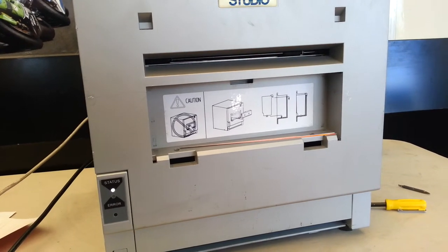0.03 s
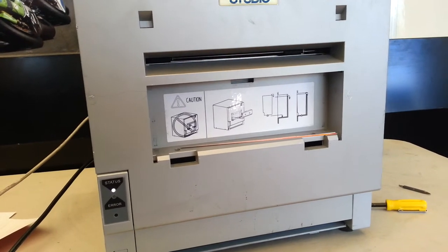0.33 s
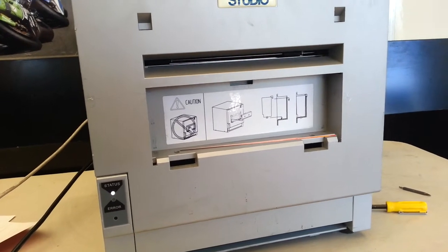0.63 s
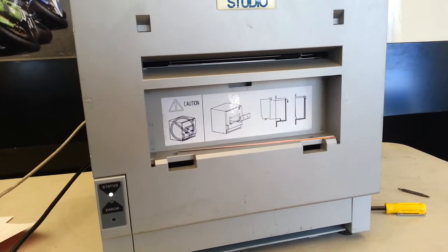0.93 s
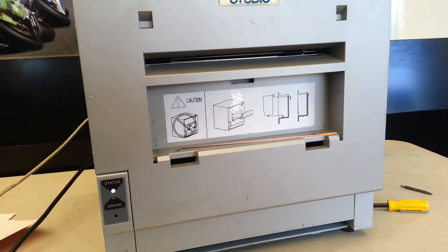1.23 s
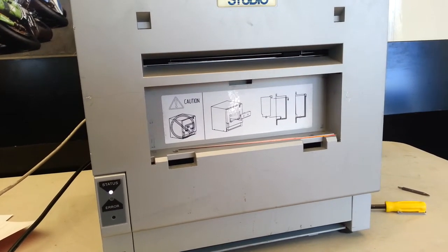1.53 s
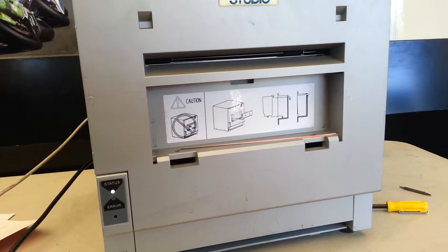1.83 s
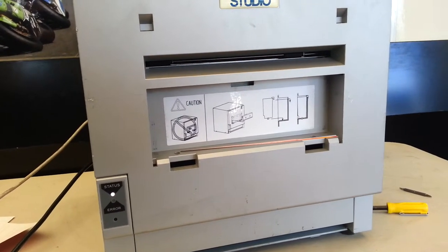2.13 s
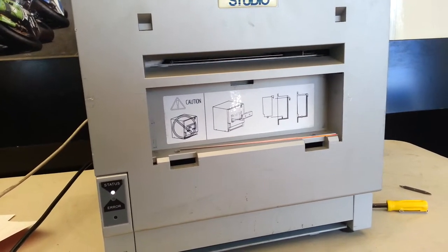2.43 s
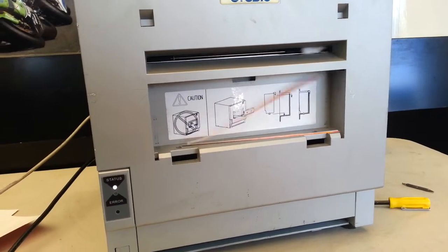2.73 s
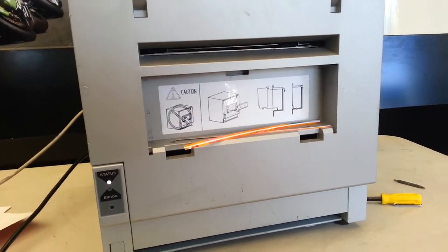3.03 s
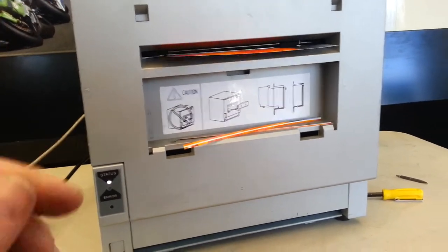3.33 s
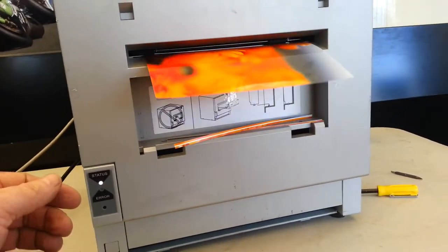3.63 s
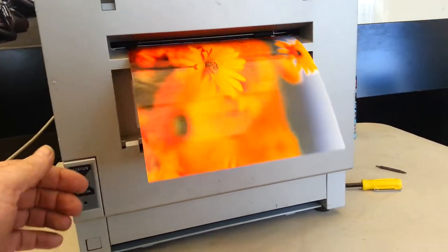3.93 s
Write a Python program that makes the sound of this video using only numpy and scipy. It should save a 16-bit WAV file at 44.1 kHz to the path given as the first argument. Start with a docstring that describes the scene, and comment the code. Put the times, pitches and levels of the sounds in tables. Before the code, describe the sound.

Printer motors whir and whine, with clunks, two buzzing cutter strokes and sliding paper.

```python
"""A photo printer on a desk finishes a print. First, stepper motors (which turn in tiny, quick steps)
whine over whirring gears. Around 1.5 s they stop and the mechanism clunks over. The paper feed motor
runs, and from 2.5 s two fast, buzzy cutter strokes each end in a clack. From 3 s the feed motor runs
again and the sheet slides out with a rising hiss."""
import sys
import numpy as np
from scipy import signal
from scipy.fft import rfft, irfft, next_fast_len
from scipy.io import wavfile
from scipy.ndimage import map_coordinates

SR = 44100
rng = np.random.default_rng(int(sys.argv[2]) if len(sys.argv) > 2 else 0)


def store_wav(level_fs):
    """Save 16-bit WAV to argv[1]."""
    pcm = np.round(np.clip(np.atleast_2d(level_fs), -1, 1) * 32767)
    wavfile.write(sys.argv[1], SR, pcm.T.astype(np.int16))


N = 176400
T = np.arange(N) / SR
JITTER_RAD, FLUTTER_DB = 0.068, 1.5  # how much a motor tone wavers in timing and loudness
GEAR_CHANGE_S = 1.82  # the print gears stop and the feed gears start


# Tones of the roller and ribbon motors: f/Hz, level/dB, left minus right/dB, left lead/rad
ROLLER_TONES = [(1295.6, -30.8, 13, -.4), (3886.8, -47, 4.5, 2.1), (5182.4, -62, 2.5, .6),
                (4764, -65, 4, 0)]
RIBBON_TONES = [(1420.56, -33, 16, -1.7), (1453, -45, 12, -1), (231.5, -48, 0, 0), (1190, -53, -2, 0),
                (710.6, -53, -2, 0)]
# Whir of the print gears: f/Hz, level/dB
PRINT_WHIR = [(40, -49), (125, -26.5), (170, -11), (290, -0.5), (370, -7), (600, -14.5), (1000, -9.5),
              (1500, -7.5), (1950, -17.5), (4500, -24.5), (6000, -33), (7700, -27.5), (9500, -37.5),
              (14000, -41)]
def print_motors():
    """The roller and ribbon motors hold their pitches over gear noise; a thin whine pulses."""
    roller = amp(1.5) * tones(ROLLER_TONES, T) * gate(-1, 1.394)
    ribbon = amp(0.5) * tones(RIBBON_TONES, T) * gate(-1, 1.645)
    pulse = 1 - 0.52 * np.cos(2 * np.pi * 5.92 * (T - 0.133))  # about six a second
    whine = pulse * tones([(2381, -43.3, -6, .2)], T, flutter_db=0.4)
    gears = amp(-38) * noise(PRINT_WHIR)
    return roller + ribbon + (whine + gears) * gate(-1, GEAR_CHANGE_S)


# Runs of the feed motor: start t/s, braking t/s
FEED_TIMES = [(1.809, 2.383), (3.034, 4.1)]
# Tones of its steps: multiple of the step rate, level/dB, left minus right/dB, left lead/rad
STEPPER_TONES = [(1, -30.5, 7, -.3), (2, -55, -8, -.3), (3, -47.5, 7, -2.1), (4, -64, -4, 0),
                 (5, -60, -4, -.4), (7, -72, -5, 0)]
# Extra tones at full speed: f/Hz, level/dB, left minus right/dB, left lead/rad
CRUISE_TONES = [(1346.25, -31, 10, -.9), (1453, -46, 12, -1), (2628.4, -62, -8, -.3), (387.6, -49, 1, 0)]
# Whir of the feed gears: f/Hz, level/dB
FEED_WHIR = [(85, -50), (135, -5.5), (190, -2.5), (310, 1.5), (560, -4.5), (820, 3.5), (1150, -8.5),
             (1500, 2.5), (2000, -13.5), (4000, -14), (6000, -29), (14000, -31)]
def feed_motor():
    """The motor speeds up roughly, settles, runs with a nearby tone beating against it, and brakes."""
    full_speed_hz, ramp_s = 1282.13, .088
    overshoot_db, settle_s = 4, .04  # the rotor overshoots on reaching full speed
    drive = cruise = 0
    for start, brake in FEED_TIMES:
        drive += np.clip(np.minimum(T - start, brake + ramp_s - T) / ramp_s, 0, 1)
        overshoot = amp(overshoot_db * np.exp(-abs(T - start - ramp_s) / settle_s))
        cruise += gate(start + ramp_s, brake) * overshoot
    step_hz = full_speed_hz * drive ** .45
    cycles = np.cumsum(step_hz) / SR
    steady = amp(1.5) * (tones(STEPPER_TONES, cycles) + tones(CRUISE_TONES, T))
    # While the speed changes, one overtone sweeps through the note at which the frame rings.
    frame = tones([(3, -26, -8, 0)], cycles, jitter_rad=1.8, flutter_db=3)
    frame *= resonance(3 * step_hz, centre_hz=2430, width_hz=340) * wobble(650)
    growl = drive * tones([(0.97, -32.5, 6, 0.0044)], cycles, jitter_rad=1.8, flutter_db=9.7)
    changing_speed = (drive > 0) & (drive < 1)
    gears = amp(-38.5) * noise(FEED_WHIR) * gate(GEAR_CHANGE_S, 5)
    return cruise * steady + changing_speed * (frame + growl) + gears


# The cutter's path out and back: t/s, f/Hz, level/dB
OUT_PATH = [(2.47, 1386, -14), (2.495, 1526, 0.5), (2.515, 1578, -6.5), (2.545, 1508, 8), (2.578, 1443, -1),
            (2.603, 1439, 6.5), (2.635, 1449, -0.5), (2.705, 1441, 1.5), (2.74, 1460, -4), (2.77, 1494, -6)]
BACK_PATH = [(2.785, 588, -5), (2.822, 569, 3.5), (2.868, 560.7, 3), (2.932, 558.4, 3.5), (2.965, 557, 4),
             (2.99, 563, 0), (3.015, 553, 1.5), (3.038, 564, 3)]
# Buzz of its gear teeth: multiple of the pitch, level/dB, left minus right/dB, left lead/rad
OUT_BUZZ = [(1, -20.5, 8, -2), (2, -25, 0.5, -1.77), (3, -30.5, 4.5, 4.5), (4, -43, -4, 1.5)]
BACK_BUZZ = [(1, -41.5, 0, 0.1), (2, -40, 2, -1.3), (3, -39, 1, -1.5), (6, -35.5, 6, 4.5),
             (9, -35.5, 0.5, 0.9), (12, -49, 0, 1.1)]
# Its rasping noise: f/Hz, level/dB
OUT_NOISE = [(90, -53), (170, -15), (330, 0), (600, -6), (900, 7), (1500, 4.5), (2100, -3.5), (3000, 4),
             (4600, 0), (6000, -10), (9000, -14), (11500, -7.5), (14000, -16)]
BACK_NOISE = [(95, -44), (160, -8), (330, -9.5), (600, -10), (900, -22), (1500, -4), (2100, -17.5),
              (3500, -8.5), (6000, -21), (9000, -23), (14000, -33)]
def cutter():
    """The blade runs out with a high buzz and comes back with a lower one."""
    outward = cutter_stroke(OUT_PATH, OUT_BUZZ, OUT_NOISE, jitter_rad=.65, rasp_db=-24)
    back = cutter_stroke(BACK_PATH, BACK_BUZZ, BACK_NOISE, jitter_rad=.36, rasp_db=-32.5)
    return outward + back


def cutter_stroke(path, buzz_tones, rasp_spectrum, jitter_rad, rasp_db):
    """Gear teeth buzz, roughest as the blade bites, and sag in pitch under load over a grainy rasp."""
    times, hz, _ = np.transpose(path)
    cycles = np.cumsum(np.interp(T, times, hz)) / SR
    bite = 1 + 4.5 * np.exp(-abs(T - times[0]) / .03)
    buzz = tones(buzz_tones, cycles, jitter_rad * bite, flutter_db=2.2)
    housing_ring = lambda f: 1 + amp(9) * resonance(f, centre_hz=4770, width_hz=124)
    buzz = filtered(buzz, housing_ring)
    grain = unit(amp(2.1 * wobble(700) + .6 * wobble(60)))
    chatter = unit(amp(2.3 * wobble(140)))
    rasp = amp(rasp_db) * grain * noise(rasp_spectrum) * gate(times[0] + 0.016, times[-1], fade_s=0.024)
    return swell(path) * buzz * chatter + rasp


# Knocks: t/s, thud level/dB, panel level/dB, crack level/dB, shudder length/s, boosted panel f/Hz
KNOCKS = [(0.028, -32, -40.5, -45, .004, 745), (1.4992, -24, -14, -22, 0.0059, 415),
          (1.639, -11, -19, -33, 0.0058, 745), (1.654, -10.5, -16.5, -27, 0.0091, 745),
          (1.691, -22, -41, -46, .006, 925), (1.732, -24, -39, -48, .004, 925),
          (1.814, -14, -19, -31, 0.012, 925), (1.826, -11.5, -19, -27.5, 0.013, 925),
          (1.867, -14.5, -10, -23.5, 0.0056, 925), (2.467, -32.5, -28, -38, .03, 415),
          (2.769, -33, -13.5, -6.5, .002, 1170), (3.039, -18, -15, -9.5, 0.034, 925),
          (3.066, -26.5, -21.5, -25, 0.049, 925)]
# Low notes of the case: f/Hz, level/dB, time to fade by 60 dB/s
CASE_NOTES = [(310, 2.5, 0.07), (264, -10.5, 0.23), (395, -14, 0.16), (174.5, -18.5, 0.17)]
# Noise of a rattling panel and of a sharp crack: f/Hz, level/dB
PANEL_NOISE = [(110, -47), (200, -4.5), (500, -14.5), (900, 0.5), (1430, 1.5), (1900, -3), (3000, -9.5),
               (8000, -47)]
CRACK_NOISE = [(300, -38), (1800, -12), (3200, 0), (4900, 0), (6000, -9.5), (9000, -15.5), (12000, -18),
               (15000, -31)]
def clunks():
    """Each knock makes the case shudder briefly; panels ring, rattle and crack into the room."""
    thuds, rattles = np.zeros(N), np.zeros((2, N))
    panel_noise, crack_noise = noise(PANEL_NOISE), noise(CRACK_NOISE)
    thud_rise_s, rattle_rise_s, low_cut_hz = .0022, .0007, 148
    t = T[:SR // 3]
    for start, thud_db, panel_db, crack_db, shudder_s, boosted_hz in KNOCKS:
        span = slice(round(start * SR), round(start * SR) + len(t))
        after_shudder = np.maximum(t - shudder_s, 0)
        case = 0
        for hz, db, fade_s in CASE_NOTES:
            detune = 1 + rng.normal(0, .01)
            case += decay(after_shudder, db, fade_s) * np.sin(2 * np.pi * hz * detune * t)
        thuds[span] += amp(thud_db) * case * (1 - np.exp(-t / thud_rise_s))
        panel = panel_ring(boosted_hz, t) + amp(-5) * panel_noise[:, span]
        panel *= decay(t, panel_db, fade_s=.085)
        crack = decay(t, crack_db, fade_s=.058) * crack_noise[:, span]
        rattles[:, span] += (panel + crack) * (1 - np.exp(-t / rattle_rise_s))
    low_cut = signal.butter(2, low_cut_hz, "high", fs=SR, output="sos")
    return signal.sosfilt(low_cut, thuds) + room_echo(rattles)


# Notes at which a panel rings: f/Hz, level/dB
PANEL_NOTES = [(415, -14), (745, -6), (925, -11), (1170, -11), (1425, -3), (1660, -11)]
def panel_ring(boosted_hz, t):
    """A panel rings at several notes at once; the spot where it is hit brings one of them out."""
    ring = 0
    for hz, db in PANEL_NOTES:
        boost_db = 11 * np.exp(-((hz - boosted_hz) / 80) ** 2)
        pan = unit(amp(look_up(BALANCE, hz) * np.array([[.5], [-.5]])))
        ring += amp(db + boost_db + rng.normal()) * pan * np.sin(2 * np.pi * (hz * t + rng.random()))
    return ring


# Loudness of the sheet's early rustle, its hiss on the way out and its rubbing: t/s, level/dB
RUSTLE_SWELL = [(.34, -61), (.44, -50), (.52, -61)]
HISS_SWELL = [(3.08, -34.5), (3.2, -40.5), (3.6, -38), (4, -37)]
RUB_SWELL = [(3.28, -43), (3.4, -39), (3.48, -31.5), (3.56, -38), (3.74, -43.5)]
# Noise of hissing and of rubbing paper: f/Hz, level/dB
HISS_NOISE = [(200, -29), (1500, -1), (2350, -13), (3050, -2), (3600, -9), (4500, -2.5), (5600, -12.5),
              (7500, -9.5), (9400, -15.5), (10600, -6.5), (12000, -12.5), (13200, -10), (14500, -30)]
RUB_NOISE = [(300, -35), (900, 6), (2100, 9), (3000, 9), (4200, -9), (9000, -66)]
def paper():
    """The sheet hisses and rubs through the slot, which rings unevenly."""
    hiss = (swell(RUSTLE_SWELL) + swell(HISS_SWELL)) * noise(HISS_NOISE)
    rub = swell(RUB_SWELL) * noise(RUB_NOISE)
    slot = gate(HISS_SWELL[0][0], 5) * tones([(3060, -47, 5, 0)], T, jitter_rad=2.4, flutter_db=1.7)
    return slot + (hiss + rub) * unit(amp(0.6 * wobble(300)))


# Loudness of the scrape as the mechanism shifts and as the feed brakes: t/s, level/dB
SHIFT_SWELL = [(1.39, -67), (1.44, -36.5), (1.575, -28.5), (1.63, -31.5), (1.72, -33.5), (1.81, -37)]
BRAKE_SWELL = [(2.385, -42), (2.42, -31.5), (2.45, -38.5), (2.475, -23.5), (2.51, -22), (2.56, -23.5)]
# Noise of the scrape: f/Hz, level/dB
SCRAPE_NOISE = [(60, -66), (170, -5), (320, -2.5), (600, -11), (1400, -3), (2000, -14), (4500, -17.5),
                (7000, -26.5), (14000, -34)]
def cam_scrape():
    """The cam (an off-centre wheel) and the gears scrape between motor runs."""
    loudness = swell(SHIFT_SWELL) + swell(BRAKE_SWELL)
    return loudness * noise(SCRAPE_NOISE) * unit(amp(3.6 * wobble(160)))


# Latch clicks: t/s, level/dB
LATCH_CLICKS = [(1.565, -37), (1.649, -29), (1.82, -32), (3.095, -24.5)]
def latches():
    """Small latches click, each a short burst of bright noise."""
    bursts = sum((T > start) * decay(abs(T - start), db, fade_s=.032) for start, db in LATCH_CLICKS)
    return bursts * noise([(5500, -20), (11000, 0)])


# Tones of the hum: f/Hz, level/dB
HUM_TONES = [(311.8, -47.5), (509, -52)]
def hum():
    """Two faint, wavering tones sound the whole time."""
    return tones([(hz, db, 0, 0) for hz, db in HUM_TONES], T, jitter_rad=0.39, flutter_db=3.5)


def room_echo(x):
    """Adds a short office echo, which starts 5 ms after the sound."""
    t = T[:SR // 2]
    tail = noise([(1000, 0)])[:, :len(t)] * decay(t, 0, fade_s=.22) * (t > .005)
    tail /= np.linalg.norm(tail[0])
    return x + amp(-4.5) * signal.fftconvolve(x, tail, axes=1)[:, :N]


# How alike the two ears hear the printer: f/Hz, likeness (1 = the same)
LIKENESS = [(40, 0), (150, 0.93), (350, 0.96), (600, 0.57), (1000, 0.73), (2000, 0), (14000, 0)]
# Which ear hears it louder: f/Hz, left minus right/dB
BALANCE = [(300, -0.5), (700, 1.5), (1100, 3.5), (1500, 9.5), (2050, -7.5), (3000, 4), (4500, 0.5),
           (6000, 0.5), (14000, -2)]
def noise(spectrum):
    """Stereo noise of strength 1 from the printer's place, shaped by rows of f/Hz, level/dB."""
    def spread(hz):
        angle = np.arccos(np.clip(look_up(LIKENESS, hz), -1, 1)) / 2
        return amp(look_up(spectrum, hz)) * [np.cos(angle), np.sin(angle)]
    mid, side = filtered(rng.standard_normal((2, N)), spread)
    pan = lambda hz: np.sqrt(1 / (1 + amp(look_up(BALANCE, hz) * [[-1], [1]]) ** 2))
    return unit(filtered(np.array([mid + side, mid - side]), pan))


def tones(rows, cycles, jitter_rad=JITTER_RAD, flutter_db=FLUTTER_DB):
    """Wavering stereo tones at multiples of a cycle count; with T as the count, multiples are in Hz."""
    mix, sides = np.zeros((2, N)), np.array([[.5], [-.5]])
    for multiple, db, pan_db, lead in rows:
        pan = amp(pan_db * sides)
        phase = 2 * np.pi * multiple * cycles + jitter_rad * wobble(170) + lead * sides
        loudness = amp(db + flutter_db * wobble(29.695))
        mix += np.sqrt(2) * loudness * pan / pan.mean() * np.sin(phase)
    return mix


def amp(db):
    """Turns decibels into a gain."""
    return 10 ** (np.asarray(db) / 20)


def unit(x):
    """Scales x to an average strength (rms) of 1."""
    return x / np.sqrt(np.mean(x ** 2) + 1e-20)


def decay(t, db, fade_s):
    """A gain that starts at db and drops 60 dB every fade_s."""
    return amp(db - 60 * t / fade_s)


def resonance(hz, centre_hz, width_hz):
    """How strongly a part rings along: 1 at its own note, less to either side."""
    return 1 / (1 + ((hz - centre_hz) / width_hz) ** 2)


def look_up(points, hz):
    """Reads between rows of f/Hz, value, on a scale of octaves."""
    f, values = np.transpose(points)
    return np.interp(np.log(hz + 1), np.log(f + 1), values)


def wobble(rate):
    """A smooth curve through `rate` random points a second."""
    return map_coordinates(rng.standard_normal(4096), [T * rate], mode="wrap")


def gate(on, off, fade_s=0.0029):
    """1 between two times, with short fades."""
    return np.clip((T - on) / fade_s + .5, 0, 1) * np.clip((off - T) / fade_s + .5, 0, 1)


def swell(rows):
    """A gain that follows rows of t/s, ..., level/dB and is silent outside them."""
    times, *_, db = np.transpose(rows)
    return amp(np.interp(T, times, db)) * gate(times[0], times[-1])


def filtered(x, response):
    """Scales each frequency in x by response(hz)."""
    size = next_fast_len(N + 8192)
    return irfft(rfft(x, size) * response(np.fft.rfftfreq(size, 1 / SR)), size)[..., :N]


def scene():
    """All the printer's sounds added together, in stereo."""
    return hum() + cutter() + print_motors() + feed_motor() + cam_scrape() + paper() + clunks() + latches()


def record(dry):
    """Clips peaks at full scale and removes the highest treble."""
    return filtered(np.clip(dry, -1, 1), lambda hz: hz < 14900)


dry = scene()
out = record(dry)
store_wav(out)
```